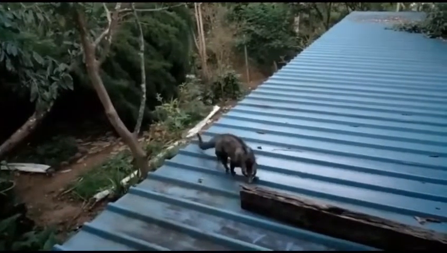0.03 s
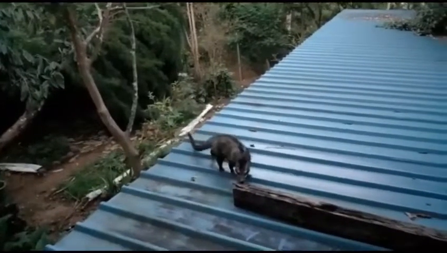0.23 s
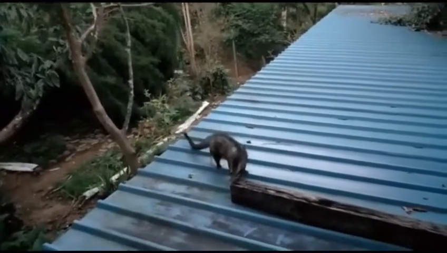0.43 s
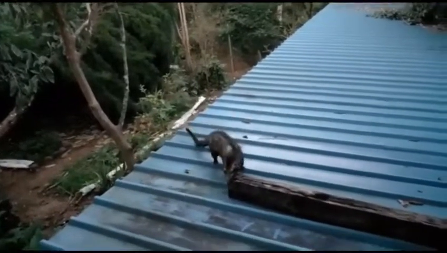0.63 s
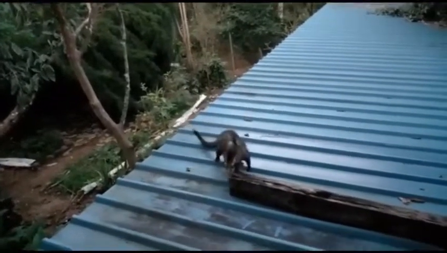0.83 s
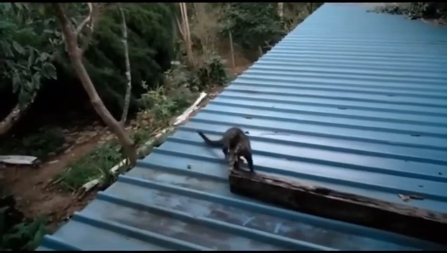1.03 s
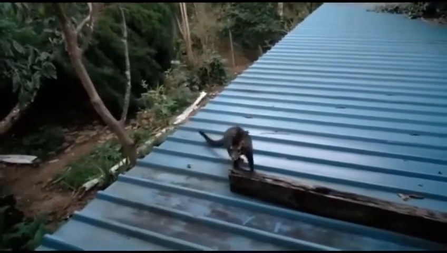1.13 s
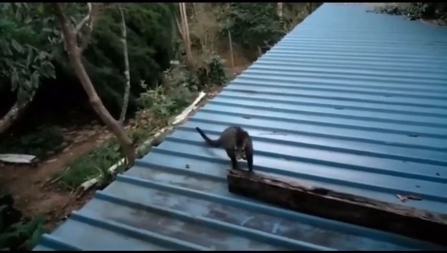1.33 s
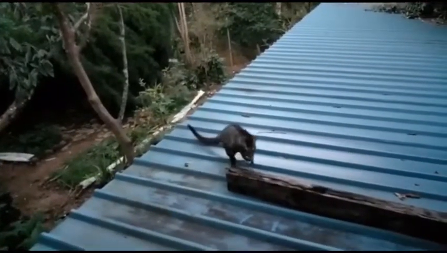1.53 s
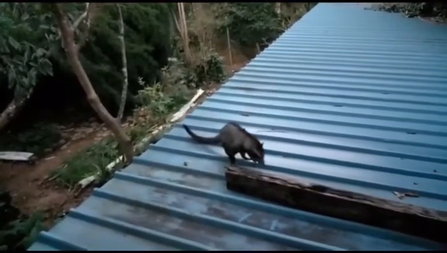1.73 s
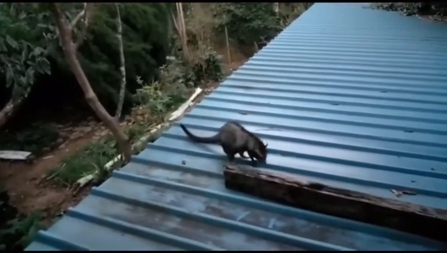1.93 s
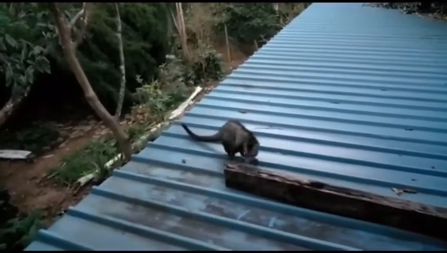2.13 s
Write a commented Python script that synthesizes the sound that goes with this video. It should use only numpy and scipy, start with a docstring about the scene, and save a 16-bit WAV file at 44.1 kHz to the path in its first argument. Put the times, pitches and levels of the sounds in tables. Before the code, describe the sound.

Two high, wavering civet screams slide down in pitch over a steady outdoor rush.

```python
"""Civet screaming on a metal roof.

Two shrill, wavering cries, vocal folds through throat resonances, break into a rasp as the pitch falls.
Soft breath hisses come between them; brief squeaks mark the voice breaking off and setting in.
Sheet-metal roof and trees scatter the sound. Behind it: a steady outdoor rush, two faint notes,
perhaps a bird, and a far drone, likely an engine, rising in pitch."""
import sys
import numpy as np
from scipy import signal
from scipy.fft import rfft, irfft, next_fast_len
from scipy.io import wavfile
from scipy.ndimage import uniform_filter1d

SR = 44100
rng = np.random.default_rng(int(sys.argv[2]) if len(sys.argv) > 2 else 0)


def wav_out(sig):
    """Save sig, one row per channel (or a flat mono array), as 16-bit PCM at SR to the path in sys.argv[1]."""
    wavfile.write(sys.argv[1], SR, np.round(np.clip(np.atleast_2d(sig).T, -1, 1) * 32767).astype(np.int16))


N = 95961


def screams():
    """Two cries, each with its own contour and throat shape."""
    # Each row: time in seconds, pitch in Hz, level in dB, roughness 0-1, treble gain in dB.
    first_contour = [(0, 2957, -35, 0.16, -12), (.02, 2985, -37, 0.17, -3.5), (.08, 2959, -31.5, 0.14, 2),
                     (.122, 3140, -40, 0.18, 11.5), (.155, 2998, -30, 0.22, 4),
                     (.206, 2983, -35.5, 0.02, 12.5), (.222, 2750, -29, 0.21, 7.5),
                     (.255, 2610, -32, 0.06, 16), (.292, 2564, -27, 0.01, 10.5),
                     (.322, 2281, -26.5, 0.1, 2.5), (.357, 2230, -22.5, 0.25, 7.5),
                     (.376, 1831, -28, 0.19, 5), (.42, 1737, -26.5, 0.07, 3), (.45, 1562, -29, 0.42, 9.5),
                     (.47, 1380, -24.5, 0.62, -1), (.526, 1058, -29.5, 0.88, -18),
                     (.54, 975, -43, 0.04, -7), (.565, 920, -52, 0.5, 16)]
    second_contour = [(1.788, 1880, -41, .5, 3), (1.804, 2065, -20.5, 0.37, -18),
                      (1.826, 2230, -22.5, 0.15, 2.5), (1.846, 2524, -26.5, 1, 0),
                      (1.88, 2806, -25, 0.2, 0.5), (1.91, 2526, -24.5, 0.41, 2.5),
                      (1.95, 2822, -26, 0.26, 6), (1.984, 2567, -25.5, 0.1, 2.5),
                      (2.0, 2619, -24, 0.039, -3.5), (2.044, 2627, -24, 0.045, 3),
                      (2.062, 2568, -26.5, 0.1, 6.5), (2.09, 2225, -24.5, 0.2, 15),
                      (2.11, 2422, -28, 0.36, 10), (2.135, 2535, -27, 0.19, 6), (2.15, 2340, -25, .7, 11.5),
                      (2.168, 1844, -34.5, .4, 12), (2.19, 1720, -29, .4, 4)]
    # Throat and mouth response. Each row: frequency in Hz, relative gain in dB.
    first_throat = [(900, -43), (1800, -20), (2250, -12.5), (3000, -9.5), (3550, -1), (4200, 12.5),
                    (5300, 7.5), (6100, -3.5), (6700, -12.5), (7700, -25), (9100, -17), (10400, -14.5),
                    (11400, -10.5), (12000, -26), (12500, -30)]
    second_throat = [(900, -23), (2200, -20), (2800, -9), (3100, -39), (3500, 9), (4200, 7), (4750, 2),
                     (5150, 8.5), (5700, -7), (6000, -25), (7500, -32.5), (8400, -25), (9200, -40.5),
                     (10400, -16), (11500, -30.5), (12500, -39)]
    return scream(first_contour, first_throat) + scream(second_contour, second_throat)


def scream(contour, throat):
    """Fold harmonics sweep through the throat resonances; roughness stirs up turbulence in the mouth."""
    # Turbulence spectrum. Each row: frequency in Hz, relative level in dB.
    rasp_spectrum = [(1000, -12), (3000, -44), (3700, -7), (4250, 19.5), (4750, 16), (5200, -28),
                     (5600, 11.5), (6100, -14), (7300, -63), (9000, -14), (11000, -20), (12500, -44)]
    air_db, rasp_db = -21.5, -7.5  # against the voice: always, and added at full roughness
    treble_hz, flicker_db = 6500, 2.5
    hz, db, roughness, treble_db = curves(contour)
    folds = vocal_folds(hz, roughness)
    voice = irfft(rfft(folds) * response(throat, np.arange(N // 2 + 1) * SR / N), N)
    voice /= np.sqrt(uniform_filter1d(voice ** 2, size=700) + 1e-12)  # hold rms at 1
    turbulence = noise(lambda f: response(rasp_spectrum, f))
    cry = voice + (undb(air_db) + undb(rasp_db) * roughness) * turbulence
    body = lowpass(cry, treble_hz)
    treble = (cry - body) * undb(treble_db + flicker_db * wander(37))
    return (body + treble) * undb(db) * gate(contour)


def vocal_folds(hz, roughness):
    """Twelve harmonics; roughness shakes pitch, timing and level and adds a second vibration, a buzz."""
    waver_share, jitter_share, smear_rad = 0.0106, 0.0288, 0.3
    buzz_hz, buzz_rad = 276.4, 0.13
    hoarse_db, shimmer_db = -3, 11.5
    hz = hz * (1 + waver_share * np.sqrt(2 * roughness) * wander(52.7))
    phase = phase_of(hz * (1 + jitter_share * roughness * wander(636)))
    phase += smear_rad * np.sqrt(roughness) * wander(430)  # blurs high overtones most
    buzz = buzz_rad * roughness * np.sin(phase_of(buzz_hz * (1 + 0.2 * wander(57.1))))
    orders = np.arange(1, 13)[:, None]
    in_band = orders * hz < SR / 3
    harmonics = np.sum(in_band * np.sin(orders * (phase + buzz)), axis=0)
    # Noise band round the second harmonic.
    skirt = (wander(463) * np.sin(2 * phase) + wander(463) * np.cos(2 * phase)) / np.sqrt(2)
    shimmer = undb(shimmer_db * roughness * np.tanh(wander(396)))
    return (harmonics + undb(hoarse_db) * roughness * skirt) * shimmer


def hisses():
    """Unvoiced air swells, flutters and fades in the moving resonances of the mouth."""
    # Each row: start and length in seconds, level in dB, centre and width in Hz, rise in Hz/s.
    breaths = [(0.639, .16, -42, 4020, 800, 4003), (0.63, 0.13, -49.5, 5360, 700, 0),
               (0.827, 0.055, -51, 4600, 720, 0), (0.835, 0.14, -54, 5430, 700, 3.5),
               (1.133, .18, -51, 4200, 650, -6), (1.495, 0.17, -48.5, 4150, 700, -1000)]
    flutter_db = 3
    out = np.zeros(N)
    for start_s, length_s, db, centre_hz, width_hz, rise_hz_per_s in breaths:
        age_s = clock() - start_s
        swell = np.sin(np.pi * np.clip(age_s / length_s, 0, 1))
        glide = np.exp(1j * np.pi * rise_hz_per_s * (age_s - length_s / 2) ** 2)
        air = np.real(signal.hilbert(resonance(centre_hz, width_hz)) * glide)
        out += swell * undb(db + flutter_db * np.tanh(wander(90))) * air
    return out


def squeaks():
    """Brief tones as the voice breaks off or sets in."""
    # Each row: start and length in seconds, level in dB, pitch in Hz, glide in Hz/s.
    voice_breaks = [(.528, 0.029, -39, 2860, -8000), (1.787, 0.02, -34, 2950, 4002)]
    return notes(voice_breaks, spread_hz=140)


def scatter(x, gain_db, t60_s, delay_s=0.004):
    """Many small reflections that die away."""
    age_s = clock() - delay_s
    echoes = rng.standard_normal(N) * (age_s > 0) * undb(-60 * np.abs(age_s) / t60_s)
    return undb(gain_db) * signal.fftconvolve(x, echoes / np.linalg.norm(echoes))[:N]


def rush():
    """Steady outdoor air, slightly restless."""
    # Each row: frequency in Hz, relative spectral density in dB.
    spectrum = [(25, -39), (60, -5.5), (110, -7), (200, 0), (300, 3.5), (480, 5), (620, -0.5), (1200, 2),
                (2500, 0), (4300, 1), (5200, -9), (6200, -22), (7300, -43), (9000, -30), (11500, -28.5),
                (12500, -46)]
    # Each row: time in seconds, level in dB.
    levels = [(0, -46), (.5, -44.5), (.7, -46.5), (1.1, -47.5), (1.7, -47.5), (1.9, -45), (2.18, -43)]
    db, = curves(levels)
    return noise(lambda f: response(spectrum, f)) * undb(db + 0.15 * wander(24))


def drone():
    """Far engine-like hum with three unsteady harmonics."""
    # Each row: time in seconds, pitch in Hz, level in dB.
    contour = [(1.35, 114, -78), (1.43, 114.7, -69), (1.52, 133.4, -66.5), (1.58, 133.7, -60.5),
               (1.68, 144.8, -60), (1.76, 145.2, -66.5), (1.83, 154.1, -60), (1.95, 140, -72.5),
               (2.18, 149, -66)]
    # Each row: harmonic number, gain in dB.
    harmonics = [(1, 7.5), (2, 3.5), (3, -31)]
    hz, db = curves(contour)
    phase = phase_of(hz * (1 + 0.017 * wander(21)))
    hum = sum(undb(gain_db + 4.8 * wander(30)) * np.sin(order * phase) for order, gain_db in harmonics)
    return hum * undb(db) * gate(contour)


def far_notes():
    """Two faint notes, perhaps a bird."""
    # Each row: start and length in seconds, level in dB, pitch in Hz, glide in Hz/s.
    calls = [(.11, 0.11, -47.5, 1340, 7), (.53, .13, -50, 1326, -500)]
    return notes(calls, spread_hz=74)


def notes(table, spread_hz):
    """Short unsteady tones that swell, glide and fade."""
    out = np.zeros(N)
    for start_s, length_s, db, hz, glide_hz_per_s in table:
        age_s = np.clip(clock() - start_s, 0, length_s)
        pitch_hz = hz + glide_hz_per_s * (age_s - length_s / 2) + spread_hz * wander(300)
        out += undb(db) * np.sin(np.pi * age_s / length_s) * np.sin(phase_of(pitch_hz))
    return out


def undb(db):
    """Decibels to gain."""
    return 10 ** (np.asarray(db) / 20)


def clock():
    """Sample times in seconds."""
    return np.arange(N) / SR


def phase_of(hz):
    """Running phase in radians."""
    return 2 * np.pi * np.cumsum(hz) / SR


def curves(table):
    """Columns interpolated linearly over time."""
    times_s, *columns = np.array(table, float).T
    return [np.interp(clock(), times_s, column) for column in columns]


def gate(table, fade_s=0.0015):
    """Open from a table's first row to its last."""
    t = clock()
    return np.clip((t - table[0][0]) / fade_s, 0, 1) * np.clip((table[-1][0] - t) / fade_s, 0, 1)


def response(points, hz):
    """Gain of a (Hz, dB) spectrum at hz."""
    points_hz, db = np.array(points, float).T
    return undb(np.interp(np.log(hz + 1), np.log(points_hz), db))


def noise(shape):
    """Noise with spectrum shape(Hz), rms 1."""
    size = next_fast_len(N)
    hz = np.arange(size // 2 + 1) * SR / size
    x = irfft(rfft(rng.standard_normal(size)) * shape(hz), size)[:N]
    return x / np.sqrt(np.mean(x ** 2))


def wander(rate_hz):
    """Smooth random motion up to rate_hz, rms 1."""
    return noise(lambda f: 1 / (1 + (f / rate_hz) ** 4))


def resonance(centre_hz, width_hz):
    """Noise in one steep band."""
    return noise(lambda f: 1 / (1 + ((f - centre_hz) / (width_hz / 2)) ** 4))


def lowpass(x, cutoff_hz):
    """Steep zero-phase low-pass."""
    hz = np.arange(N // 2 + 1) * SR / N
    return irfft(rfft(x) / (1 + (hz / cutoff_hz) ** 16), N)


def scene():
    """The civet and its reflections over the background, mono."""
    civet = screams() + hisses() + squeaks()
    roof = scatter(civet, gain_db=-2, t60_s=0.21)
    trees = scatter(lowpass(civet, cutoff_hz=5830), gain_db=-9.5, t60_s=0.53)
    return (civet + roof + trees + rush() + drone() + far_notes())[None]


def record(dry):
    """Steep cut of the top treble."""
    top_hz = 12400
    return signal.sosfilt(signal.ellip(10, 0.2, 80, top_hz, fs=SR, output="sos"), dry)


dry = scene()
out = record(dry)
wav_out(out)
```